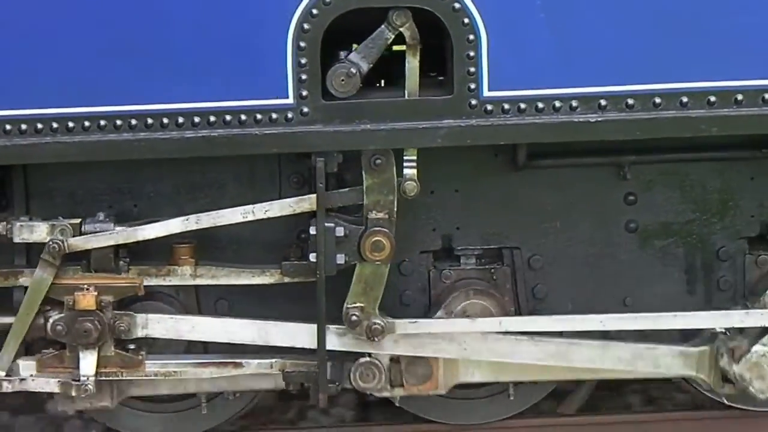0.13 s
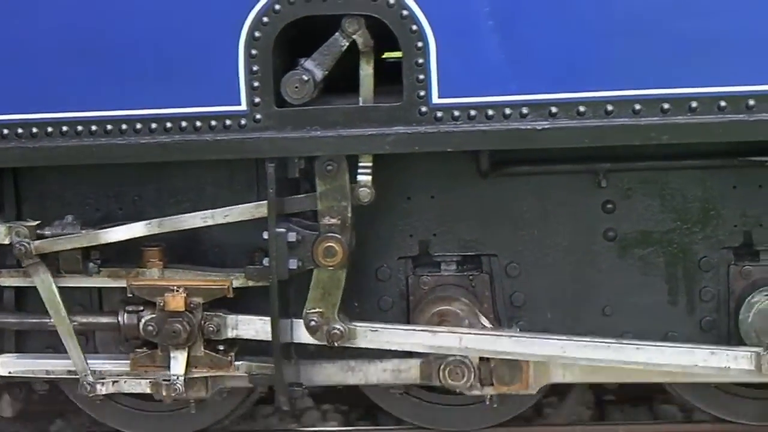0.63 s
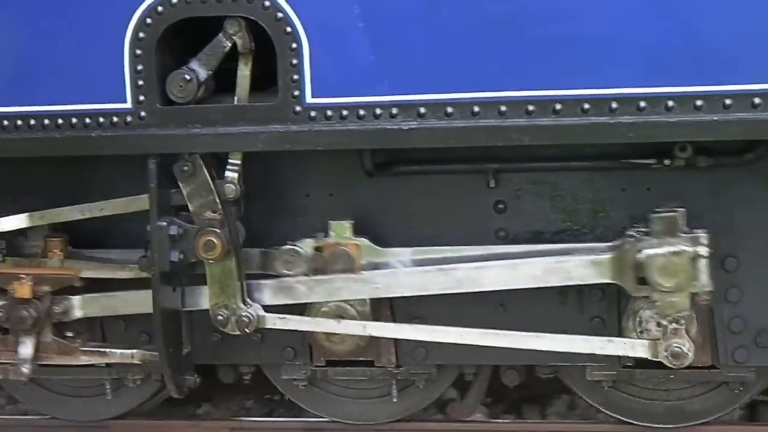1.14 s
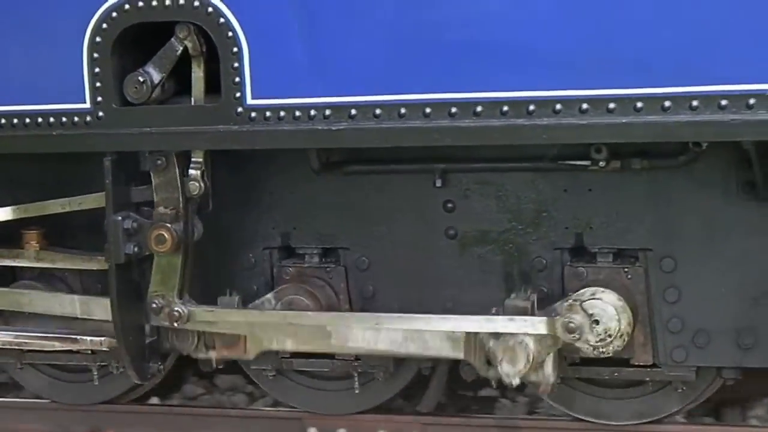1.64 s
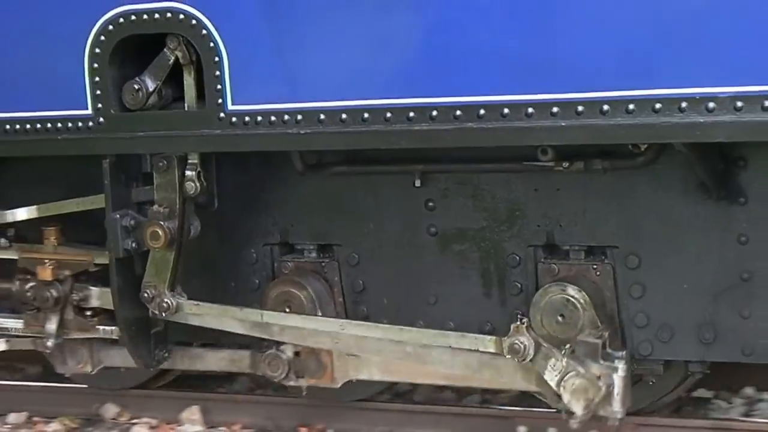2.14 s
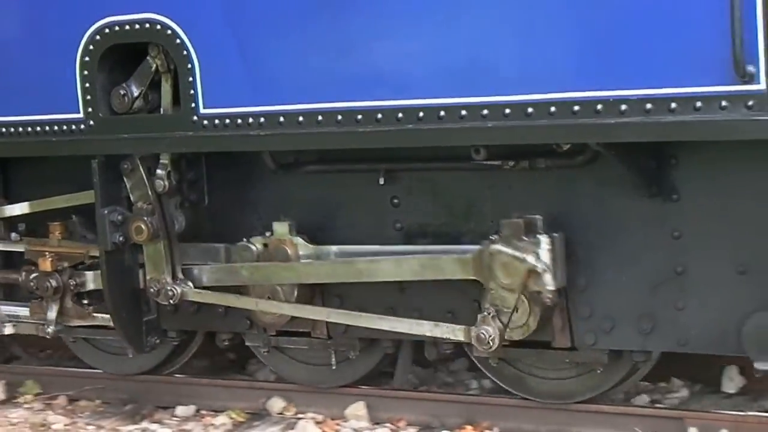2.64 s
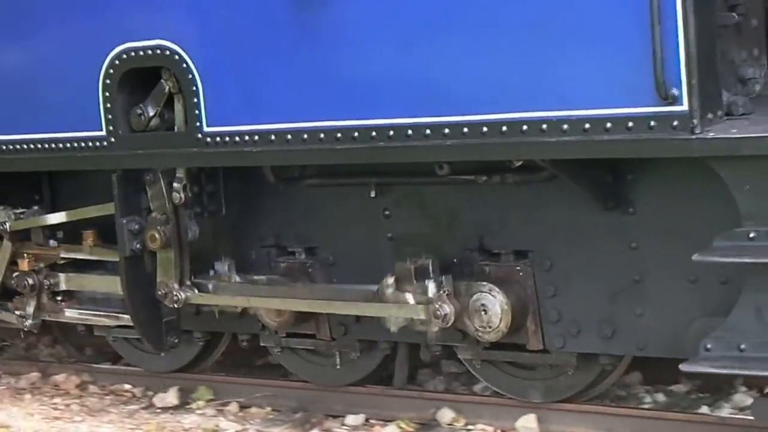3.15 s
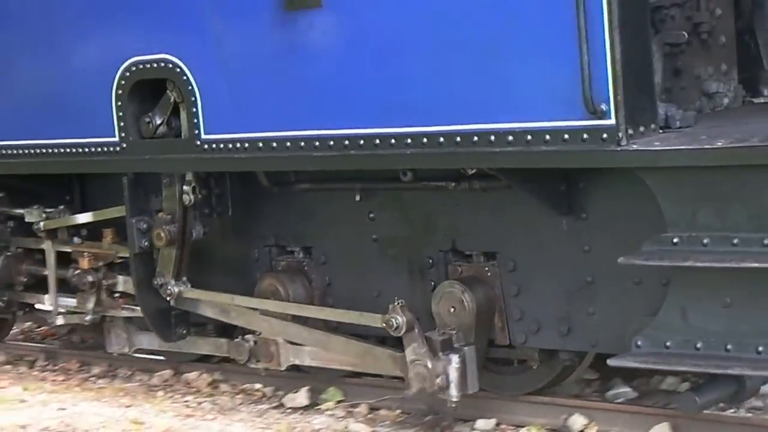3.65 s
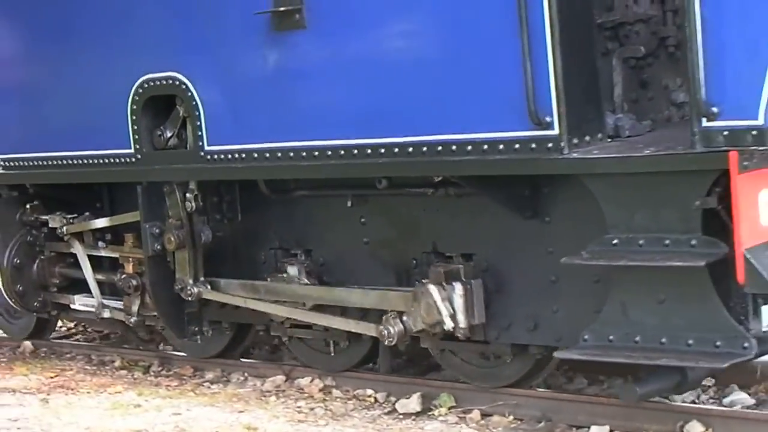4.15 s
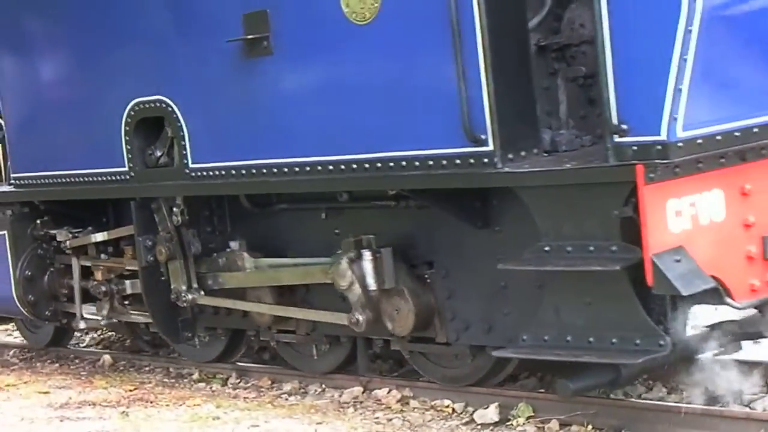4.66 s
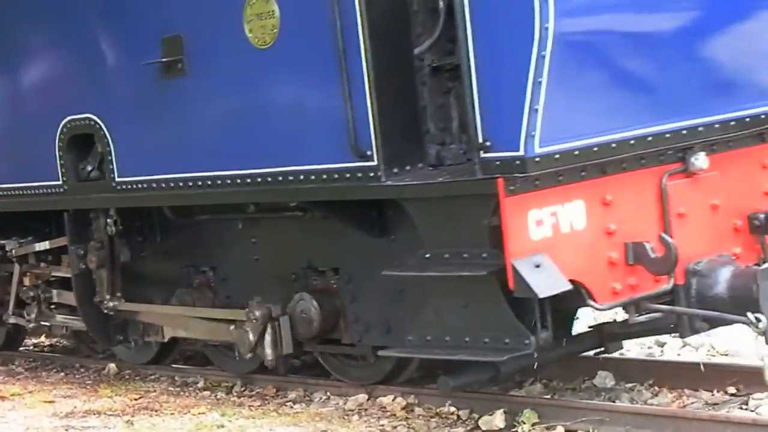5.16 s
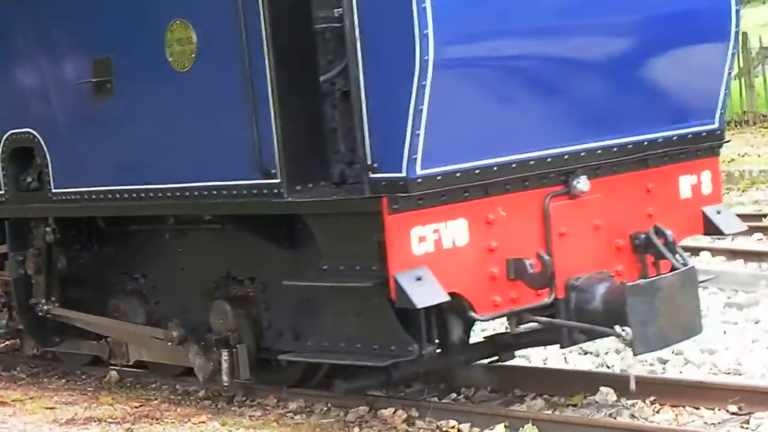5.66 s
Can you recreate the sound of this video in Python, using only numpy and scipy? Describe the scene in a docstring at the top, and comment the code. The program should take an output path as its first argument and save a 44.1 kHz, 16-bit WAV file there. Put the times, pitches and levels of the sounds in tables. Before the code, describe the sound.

Steam hisses through glands with soft quick puffs and a hollow draught, above rolling steel wheels. Heavy double thumps and a sharp clank come just before and after a sudden dense steam blast, steady and bright, leaning right in its highs. It shuts off in the fifth second; quiet simmering and dull metal knocks remain. Hand-held camera microphone, close, outdoors, with slight breeze pops at the start.

```python
"""In a yard, a small steam locomotive rolls slowly past a hand-held camera with two close microphone ports.
Steam is banded noise that surges, drifts and flickers: one long valve blast, a simmer, leaking and puffing glands.
Wheels thump over a rail joint, rods clank and one bright spit hisses: rattling blows ring damped modes. Rumble
and rolling lie beneath, and a breeze buffets and pops on the ports. The camera notches one narrow treble band."""
import sys
import numpy as np
from scipy import signal
from scipy.fft import rfft, irfft, next_fast_len
from scipy.io import wavfile
from scipy.ndimage import uniform_filter1d

SR = 44100
rng = np.random.default_rng(int(sys.argv[2]) if len(sys.argv) > 2 else 0)


def generate_wav(sig):
    """Save sig (samples, or channels by samples) to the path in sys.argv[1] as 16-bit PCM at SR."""
    pcm = np.round(np.clip(np.atleast_2d(sig).T, -1, 1) * 32767).astype(np.int16)
    wavfile.write(sys.argv[1], SR, pcm)


def level_to_linear(level):
    """Convert decibel levels to linear amplitude factors, elementwise."""
    exponent = np.asarray(level, float) / 20
    return 10 ** exponent


N = 255339
SIZE = next_fast_len(N, real=True)
T = np.arange(N) / SR
HZ = np.fft.rfftfreq(SIZE, 1 / SR) + 1e-3  # offset keeps the logarithm finite


def curve(table):
    """Columns of a time table, one value a sample."""
    time_s, *columns = np.transpose(table)
    return [np.interp(T, time_s, column) for column in columns]


def fade(table, edge_s=0.04):
    """Gain that opens and closes around a table's first and last row."""
    from_start = T - table[0][0] + edge_s
    to_end = table[-1][0] + edge_s - T
    return np.clip(np.minimum(from_start, to_end) / edge_s, 0, 1)


def over_hz(table):
    """Columns of a frequency table on the transform's bins, interpolated over log frequency."""
    hz, *columns = np.transpose(table)
    return [np.interp(np.log(HZ), np.log(hz), c, left=c[0], right=c[-1]) for c in columns]


def heard(spectrum):
    """Back from spectrum to sound."""
    return irfft(spectrum, SIZE)[..., :N]


def walk(rate_hz):
    """Random levels, one every 1 / rate_hz seconds, joined by slews; spread near 1."""
    hold = int(SR / rate_hz)
    steps = np.repeat(rng.standard_normal(N // hold + 1), hold)
    return uniform_filter1d(steps, hold)[:N]


def swells(events, drop_s=None):
    """Summed power of bell-shaped swells (peak time [s], level [dB], length [s]); drop_s replaces the fall."""
    power = 0
    for peak_s, db, rise_s in events:
        side_s = np.where(T < peak_s, rise_s, drop_s or rise_s)
        power = power + level_to_linear(2 * db) * np.exp(-((T - peak_s) / side_s) ** 2)
    return power


def ports(near, other, direction):
    """Left and right spectra of one source; the unlike share comes from scattered sound."""
    pan_db, lag_rad, like = over_hz(direction)
    like = np.clip(like, 0, 1)
    left = near * level_to_linear(pan_db / 2) * np.exp(-1j * lag_rad)
    right = (like * near + np.sqrt(1 - like ** 2) * other) * level_to_linear(-pan_db / 2)
    return np.array([left, right])


def turbulence(colour, direction, surge_db, streak_db, flicker_db, rate_hz, tilt_db=0, core_db=0,
               per_octave=2, tones=()):
    """Turbulent noise in bands that surge together while each drifts and flickers alone; port mean has rms 1."""
    near, other = rfft(rng.standard_normal((2, SIZE)))
    [shape_db] = over_hz(colour)
    for hz, width_hz, db in tones:
        shape_db = shape_db + db / (1 + (2 * (HZ - hz) / width_hz) ** 2)
    both = ports(near, other, direction) * level_to_linear(shape_db)
    surge = surge_db * walk(rate_hz)
    octave = np.log2(HZ / 5000)
    first, last = np.log2(np.array([colour[0][0], colour[-1][0]]) / 5000)
    out = 0
    for centre in np.arange(first, last + 1 / per_octave, 1 / per_octave):
        share = np.clip(1 - np.abs(octave - centre) * per_octave, 0, 1)
        band = heard((both * share).astype(np.complex64))
        own_db = streak_db * walk(rate_hz / 5) + flicker_db * walk(2 * rate_hz)
        lift_db = tilt_db * centre + core_db * np.exp(-(centre / 0.72) ** 2)
        out = out + band * level_to_linear(surge + own_db + lift_db)
    return out / np.sqrt(np.mean(out.mean(axis=0) ** 2))


def streaks(events, direction, width_share=0.021):
    """Short narrow streaks in the steam noise: bands a fixed share of their frequency wide, swelling and fading."""
    out = np.zeros((2, SIZE))
    for peak_s, hz, db, length_s in events:
        at = np.arange(int((peak_s - 2 * length_s) * SR), int((peak_s + 2 * length_s) * SR))
        resonance = signal.iirpeak(hz, 1 / width_share, SR)
        band = signal.lfilter(*resonance, rng.standard_normal((2, len(at))))
        bell = np.exp(-((at / SR - peak_s) / length_s) ** 2)
        out[:, at] += level_to_linear(db) * bell * band / np.std(band)
    return heard(ports(*rfft(out), direction))


def strike(events, modes, late_cycles, knock_db, tail_ms, tail_db):
    """A solid knock and a short noise rattle ring heavily damped modes and leave a scattered tail."""
    contact_hz = 700  # the knock is too soft a push to ring modes far above this
    low_cut_hz = 96  # keeps the blows free of deep bass
    out = np.zeros(N + SR)
    ms = np.arange(SR // 3) * 1000 / SR
    for start_s, peak_db, length_ms, bright_db in events:
        pushes = rng.standard_normal((len(modes), len(ms)))  # every mode feels the rattle at its own spot
        blow = 0
        for push, (hz, db, t60_s) in zip(pushes, modes):
            pole = np.exp(2j * np.pi * hz / SR - np.log(1000) / (t60_s * SR))
            gain = level_to_linear(db + bright_db * np.log2(hz / 500))
            swell = np.minimum(ms * hz / 1000 / late_cycles, 1)  # lows build up later than highs
            tail = level_to_linear(tail_db) * np.exp(-ms / tail_ms * (hz / 500) ** 0.7)  # and they linger
            rattle = push * swell * (np.exp(-(ms / length_ms) ** 2) + tail)
            knock = level_to_linear(knock_db) / (1 + (hz / contact_hz) ** 2) * np.sqrt(length_ms * SR / 1000)
            rattle[int(late_cycles * SR / hz / 2)] += knock * np.sign(rattle[1])
            ring = signal.lfilter([1], [1, -pole], rattle).imag
            blow = blow + gain * ring / np.std(ring[ms < 2 * length_ms])
        early_power = np.mean(blow[ms < length_ms] ** 2)
        out[int(start_s * SR):][:len(ms)] += level_to_linear(peak_db) * blow / np.sqrt(2 * early_power)
    return signal.lfilter(*signal.butter(2, low_cut_hz, "high", fs=SR), out[:N])


# valve opening: (time [s], level [dB])
VALVE_FLOW = [(2.0, -46), (2.09, -28.5), (2.14, -20), (2.19, -22.5), (2.26, -20.5), (3.47, -23.5),
              (3.71, -22), (4.4, -22.5), (4.52, -25), (4.73, -44), (4.95, -56)]
# jet spectrum: (frequency [Hz], relative density [dB per Hz])
JET_COLOUR = [(500, -74), (900, -25.5), (1340, -16.5), (1900, -14), (2300, -8), (2900, -9), (3400, -5),
              (4500, -3), (6070, 2.5), (7100, -0.5), (8300, -0.5), (9330, -2), (12100, -4), (13500, -8.5),
              (15750, -7.5)]
# valve direction: (frequency [Hz], left minus right [dB], left lag [rad], likeness [0-1])
RIGHT = [(100, 1, 4, 1), (920, 2.5, -0.5, 0.98), (1710, 1, 0.72, 1), (2170, 3, 0.5, 0.69),
         (2690, 7.5, -1, 0.71), (3200, 2.5, 1, 0.97), (4170, 2, 1.32, 0.74), (6230, -3.5, 3, 0.82),
         (7300, -6, 3.0, 0.93), (8450, -5, 3.5, 0.79), (9900, -7.5, 4, 0.93), (11300, -7, 4, 0.75),
         (13100, -6, 4.5, 0.97), (15000, 1.5, 4, .5), (15700, -1, 3.5, 0.41)]
# short narrow streaks in the steam noise: (peak time [s], frequency [Hz], level [dB], length [s])
VALVE_STREAKS = [(2.13, 1867, -33, 0.034), (2.14, 3880, -31, 0.037), (2.17, 4500, -37, .03),
                 (2.2, 3450, -32, 0.055), (2.28, 4500, -31, 0.048), (2.36, 3500, -33, .04),
                 (2.49, 2250, -32.5, 0.048)]


def blast():
    """The open valve roars off to the right, duller when part shut; its flicker stays nearly even throughout."""
    full_db, full_tilt_db_per_octave, dulling = -29, .5, 0.16  # dulling: tilt lost per dB under full flow
    core_db, core_sag_db_per_s = 2, 1.5  # swell around the jet's core, fading as the valve draws away
    extra_flicker_db, extra_s = 0.1, 0.67
    [level_db] = curve(VALVE_FLOW)
    open_s, shut_s = VALVE_FLOW[0][0], VALVE_FLOW[-1][0]
    tilt_db = full_tilt_db_per_octave + dulling * np.minimum(level_db - full_db, 0)
    sagging_db = core_db - core_sag_db_per_s * np.clip(T - open_s, 0, shut_s - open_s)
    extra_db = extra_flicker_db * np.exp(-np.maximum(T - open_s, 0) / extra_s)
    jet = turbulence(JET_COLOUR, RIGHT, surge_db=0.55, streak_db=0.76, flicker_db=1.3 + extra_db,
                     rate_hz=15., tilt_db=tilt_db, core_db=sagging_db, per_octave=6)
    return level_to_linear(level_db) * fade(VALVE_FLOW) * jet + streaks(VALVE_STREAKS, RIGHT)


# leaking steam: (time [s], thin hiss [dB], lower hiss [dB], whistling draught [dB])
GLAND_LEAK = [(0.0, -41, -40, -45.5), (0.45, -37.5, -41, -43.5), (0.95, -34.5, -42, -41.5),
              (1.28, -36, -40, -40), (1.62, -32, -37, -35.5), (1.82, -38.5, -38.5, -37.5),
              (2.06, -33.5, -39, -32.5), (2.2, -59, -39, -34), (2.55, -48, -50, -38)]
# thin hiss spectrum: (frequency [Hz], relative density [dB per Hz])
HISS_COLOUR = [(1760, -43), (3000, -8.5), (3900, -9.5), (4500, -13), (5600, -10), (6800, -8), (7900, -8.5),
               (8700, 1.5), (9700, -1), (10300, 3.5), (11500, 3), (13000, 1.5), (15750, -4.5)]
# lower hiss and puff spectrum: (frequency [Hz], relative density [dB per Hz])
PUFF_COLOUR = [(1760, -30), (3000, -8), (3900, -1), (4300, 0.5), (4800, 1.5), (5500, -2.5), (7400, 0),
               (9000, 1), (12000, -21)]
# draught spectrum: (frequency [Hz], relative density [dB per Hz])
DRAUGHT_COLOUR = [(1300, -25), (1800, -8.5), (2150, -3), (2400, 0), (2650, 3), (2950, -4), (3500, -10)]
# narrow edge tones: (frequency [Hz], width [Hz], level over the layer [dB])
EDGE_TONES = [(2100, 200, 2), (3880, 110, 1), (8600, 270, 1.5), (9540, 300, 4)]
# piston strokes: (peak time [s], puff level [dB], swell [s])
STROKES = [(0.36, -40.5, 0.041), (0.76, -35, 0.079), (1.2, -45, 0.065), (1.53, -33.5, 0.091),
           (1.94, -36.5, 0.082)]
# spits of thin hiss: (peak time [s], level [dB], length [s])
SPITS = [(0.16, -39, .03), (0.3, -36, 0.041), (0.42, -36, .03), (0.59, -38, .04), (0.86, -31.5, 0.038),
         (1.37, -35.5, .04), (1.72, -32.5, 0.033)]
# short narrow streaks in the steam noise: (peak time [s], frequency [Hz], level [dB], length [s])
GLAND_STREAKS = [(0.7, 4300, -47, 0.064), (0.76, 6040, -44, 0.044), (1.34, 4700, -50, .05),
                 (1.47, 3850, -49, .04), (1.52, 4800, -40, 0.077), (1.93, 4400, -41, 0.097)]
# engine direction: (frequency [Hz], left minus right [dB], left lag [rad], likeness [0-1])
AHEAD = [(100, 1, -0.12, 0.99), (1500, 1, 0.13, 0.94), (1960, 1, 0.33, 0.95), (2760, 5.5, -0.17, 0.53),
         (3380, 3.5, 0.81, 0.64), (4600, 2, -0.29, 0.66), (6300, 3, -0.79, 0.2), (7700, 3.5, -0.029, 0.2),
         (8340, 3, 0.75, 0.6), (9550, -6, -0.093, 0.6), (10500, 2, 0.79, 0.85), (11000, -7, -.1, 0.56),
         (12500, 2, -.7, 0.76), (14700, 5, -.4, 0.8), (15700, 7, 0, 0.9)]


def leak():
    """Steam through the glands hisses thinly and spits, puffs at each stroke and draws a hollow whistle."""
    stroke_drop_s, stroke_hiss_db, stroke_draught_db = 0.034, 2, -8  # puffs cut short; share in other layers
    hiss_db, puff_db, draught_db = curve(GLAND_LEAK)
    strokes = swells(STROKES, stroke_drop_s)
    hiss = turbulence(HISS_COLOUR, AHEAD, surge_db=-0.5, streak_db=2.1, flicker_db=2.0,
                      rate_hz=14., per_octave=5, tones=EDGE_TONES)
    puff = turbulence(PUFF_COLOUR, AHEAD, surge_db=-0.1, streak_db=2.8, flicker_db=1.0,
                      rate_hz=14.3, per_octave=3, tones=EDGE_TONES)
    draught = turbulence(DRAUGHT_COLOUR, AHEAD, surge_db=2.1, streak_db=0.7, flicker_db=2.0,
                         rate_hz=14.0, per_octave=5, tones=EDGE_TONES)
    hiss_power = level_to_linear(2 * hiss_db) + level_to_linear(2 * stroke_hiss_db) * strokes + swells(SPITS)
    puff_power = level_to_linear(2 * puff_db) + strokes
    draught_power = level_to_linear(2 * draught_db) + level_to_linear(2 * stroke_draught_db) * strokes
    steam = np.sqrt(hiss_power) * hiss + np.sqrt(puff_power) * puff + np.sqrt(draught_power) * draught
    return steam * fade(GLAND_LEAK) + streaks(GLAND_STREAKS, AHEAD)


# wheel over the rail joint: (time [s], level [dB], length [ms], brightness [dB per octave])
THUMPS = [(1.070, -32, 7.7, 5), (1.080, -25.5, 15, -2.5), (1.693, -23.5, 25, 0), (1.722, -32, 12, -5),
          (2.300, -27, 12, -2.5), (2.316, -25.5, 11, -2), (2.944, -44, 20, -14), (5.763, -49.5, 19, -7)]
# rail and wheel modes: (frequency [Hz], level [dB], decay t60 [s])
RAIL_MODES = [(112, 1, 0.1), (200, 5, 0.036), (272, 5.5, 0.031), (351, 6.5, 0.077), (479, 4.5, 0.027),
              (656, 6.5, 0.016), (1130, 5.5, 0.019), (1560, 6, 0.0089), (2210, 0, 0.033),
              (3100, 1.5, 0.0092)]


def thumps():
    """Wheels hit the rail joint and ring its damped modes."""
    near, other = (rfft(strike(THUMPS, RAIL_MODES, late_cycles=1.16, knock_db=-1.0, tail_ms=71, tail_db=-11),
                        SIZE) for _ in range(2))
    return heard(ports(near, other, AHEAD))


# rod clanks and, at 4.966 s, one bright spit of hiss:
# (time [s], level [dB], rattle [ms], brightness [dB per octave])
CLANKS_AND_SPIT = [(0.001, -29, 46, -3.5), (0.283, -37.5, 27, 6), (1.234, -34, 14, 7), (2.236, -21, 19, 3),
                   (2.270, -30, 24, 1.5), (4.966, -49, 57, 11), (5.257, -45.5, 11, 1),
                   (5.430, -30.5, 23, -2), (5.452, -40, 66, 2.5), (5.563, -42.5, 36, 1.5),
                   (5.649, -53.5, 39, -6)]
# rod modes: (frequency [Hz], level [dB], decay t60 [s])
ROD_MODES = [(156, -4, 0.12), (233, -10, 0.061), (320, -5.5, 0.016), (470, 5, 0.051), (534, 6, 0.028),
             (682, 2, 0.11), (770, -4, 0.041), (1120, 0, 0.023), (1370, -1, 0.014), (2100, -2, 0.013),
             (2570, -1.5, 0.03), (3440, 0, 0.0037), (4400, -4.5, 0.0063), (5900, -6, 0.004)]


def clanks_and_spit():
    """Loose rods clank, ringing their damped modes; one bright spit of hiss is made by the same modes."""
    near, other = (rfft(strike(CLANKS_AND_SPIT, ROD_MODES, late_cycles=1.55, knock_db=-2.0, tail_ms=86,
                               tail_db=-8), SIZE) for _ in range(2))
    return heard(ports(near, other, AHEAD))


# wheels on rail before shaking: (time [s], deep rumble [dB], rolling [dB])
ROLL = [(0.0, -57, -48), (0.45, -50, -44.5), (0.92, -62, -43), (1.3, -48.5, -42), (1.79, -46.5, -40),
        (2.0, -37, -40), (2.25, -45, -36.5), (2.48, -43.5, -39.5), (3.18, -60, -46.5), (3.76, -56, -43),
        (4.39, -64, -46.5), (4.79, -63, -60), (5.34, -61, -55.5), (5.79, -54, -59)]
# rumble spectrum: (frequency [Hz], relative density [dB per Hz])
RUMBLE_COLOUR = [(15, -49), (25, -9), (64, -2), (92, -0.5), (124, -1), (184, -5), (221, -26), (250, -12),
                 (320, -55), (550, -120)]
# rolling spectrum: (frequency [Hz], relative density [dB per Hz])
ROLLING_COLOUR = [(88, -14), (150, -2), (167, -3.5), (205, -3.5), (281, -5.5), (377, -2.5), (545, -1.5),
                  (968, -8), (2000, -4.5), (2600, -29), (4400, -120)]
# frame hum: (frequency [Hz], width [Hz], level over the rumble [dB])
FRAME_HUM = [(95, 21, 3)]


def wheels():
    """Steel on steel: a deep lumpy rumble under a rolling noise, both shaken up by the clanks."""
    shake_rumble_db, shake_rolling_db, shake_t60_s = -19, -20.5, 0.74  # levels relative to the clank
    shake_loss = 2.18  # bright events, the spit most of all, add less: dB lost per dB of brightness
    shake_dull_db_per_octave = -2.5  # the shaken frame sounds darker than the rolling
    rumble_db, rolling_db = curve(ROLL)
    shake = 0
    for start_s, db, _, bright_db in CLANKS_AND_SPIT:
        decay_db = 60 * np.maximum(T - start_s, 0) / shake_t60_s
        shake = shake + (T >= start_s) * level_to_linear(2 * (db - shake_loss * bright_db - decay_db))
    shaken_share = shake / (shake + level_to_linear(2 * (rolling_db - shake_rolling_db)))
    rumble = turbulence(RUMBLE_COLOUR, AHEAD, surge_db=-1.0, streak_db=-1.0, flicker_db=2.5,
                        rate_hz=15.0, tones=FRAME_HUM)
    rolling = turbulence(ROLLING_COLOUR, AHEAD, surge_db=-1.5, streak_db=1.0, flicker_db=3.0,
                         rate_hz=12., tilt_db=shake_dull_db_per_octave * shaken_share, per_octave=3)
    rumble_power = level_to_linear(2 * rumble_db) + level_to_linear(2 * shake_rumble_db) * shake
    rolling_power = level_to_linear(2 * rolling_db) + level_to_linear(2 * shake_rolling_db) * shake
    return np.sqrt(rumble_power) * rumble + np.sqrt(rolling_power) * rolling


# boiler as the engine draws away: (time [s], level [dB])
SIMMER = [(4.5, -42), (4.6, -39), (4.718, -46), (4.924, -45.5), (5.79, -48.5)]
# simmer spectrum: (frequency [Hz], relative density [dB per Hz])
SIMMER_COLOUR = [(600, -35), (1010, -25), (1680, -15), (2200, -3.5), (2670, -0.5), (3320, -8.5),
                 (4500, -5.5), (6300, -5), (8500, -5.5), (11500, -4.5), (12700, -4.5), (15750, -12.5)]
# boiler direction: (frequency [Hz], left minus right [dB], left lag [rad], likeness [0-1])
FAR_RIGHT = [(100, 4, 3, .9), (1600, 5, 0.5, 0.96), (2130, 5, 0.5, 0.91), (2790, 2, 1.5, 0.87),
             (3280, 6, 0.5, .55), (4400, 2.5, 1, .5), (6040, -3.5, 2.5, 0.53), (7500, -4, 2.5, 0.41),
             (9500, -2, 5, .18), (12500, -5, 4.5, .52), (15700, 2, 6, .45)]


def simmer():
    """The boiler simmers on as the valve closes: softly flickering noise."""
    noise = turbulence(SIMMER_COLOUR, FAR_RIGHT, surge_db=0.5, streak_db=-0.2, flicker_db=1.5,
                       rate_hz=18.0, per_octave=3)
    [level_db] = curve(SIMMER)
    return level_to_linear(level_db) * fade(SIMMER) * noise


# breeze: (time [s], level [dB])
BREEZE = [(0, -48), (.3, -58.5), (.6, -45.5), (1.25, -47), (1.5, -64), (2.6, -65), (5.79, -94)]
# breeze spectrum: (frequency [Hz], relative density [dB per Hz])
BREEZE_COLOUR = [(20, -20), (40, 9), (75, 10.5), (125, 10.5), (267, -24), (425, -13), (700, -39)]
# gusts popping, peaking one length after the time: (time [s], level [dB], length [ms], left minus right [dB])
POPS = [(0.132, -36, 9.3, 2), (0.554, -45, 4.4, 6), (0.597, -44, 8.1, -3), (0.836, -38.5, 6.6, 4),
        (1.019, -38, 4.6, -4), (1.043, -31, 4.3, -5)]
# pop spectrum: (frequency [Hz], relative density [dB per Hz])
POP_COLOUR = [(45, -18), (110, 12), (250, -5), (450, -1), (800, -37)]
# air pushes one port as it pulls the other:
# (frequency [Hz], left minus right [dB], left lag [rad], likeness [0-1])
OPPOSED = [(20, 2.5, np.pi, .65), (900, 2.5, np.pi, .65)]


def breeze():
    """Air buffets the ports, with a dull pop when a gust breaks on the grille."""
    gusts = turbulence(BREEZE_COLOUR, OPPOSED, surge_db=4., streak_db=1.5, flicker_db=2.5, rate_hz=30.)
    dull = turbulence(POP_COLOUR, OPPOSED, surge_db=1.5, streak_db=1.5, flicker_db=1.5, rate_hz=25.,
                      per_octave=1)
    bursts = 0
    for start_s, db, length_ms, pan_db in POPS:
        port_db = db + np.array([[pan_db], [-pan_db]]) / 2
        bursts = bursts + level_to_linear(port_db) * np.exp(-((T - start_s) * 1000 / length_ms - 1) ** 2)
    [level_db] = curve(BREEZE)
    return level_to_linear(level_db) * fade(BREEZE) * gusts + bursts * dull


def scene():
    """All sources at the two ports."""
    return blast() + leak() + thumps() + clanks_and_spit() + wheels() + simmer() + breeze()


def top_cut(x):
    """Nothing passes above the cut-off."""
    return signal.sosfilt(signal.butter(12, 16870, fs=SR, output="sos"), x)


# side channel gain: (frequency [Hz], gain [dB])
SIDE_DIP = [(1850, 0), (2100, -12), (2650, -12), (2900, 0)]


def record(dry):
    """The camera notches a narrow band, thins deep bass, cuts the top and narrows the upper middle."""
    notch_hz, notch_width_hz, low_cut_hz, top_hz = 7864, 610, 36, 15730
    notched = signal.lfilter(*signal.iirnotch(notch_hz, notch_hz / notch_width_hz, SR), dry)
    left, right = rfft(notched, SIZE) * (HZ < top_hz) / (1 + (low_cut_hz / HZ) ** 2)
    [side_db] = over_hz(SIDE_DIP)
    mid = (left + right) / 2
    side = (left - right) / 2 * level_to_linear(side_db)
    mix = heard(np.array([mid + side, mid - side]))
    return top_cut(mix)


dry = scene()
out = record(dry)
generate_wav(out)
```